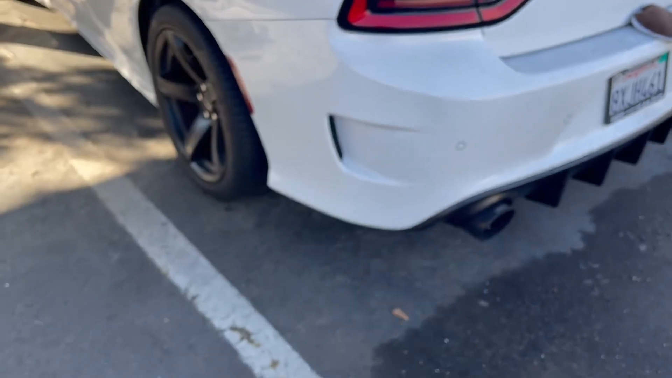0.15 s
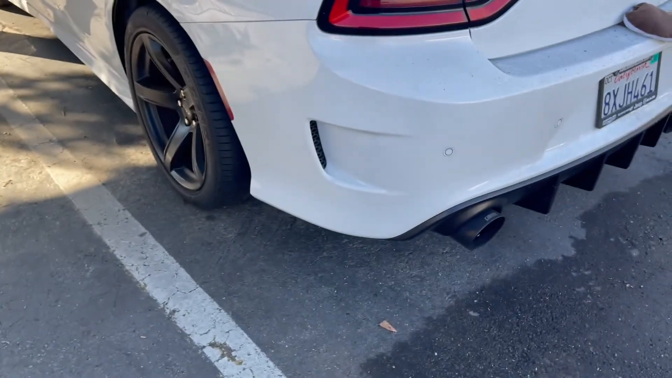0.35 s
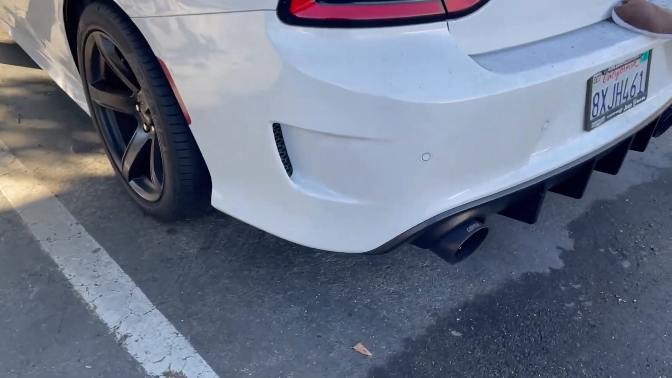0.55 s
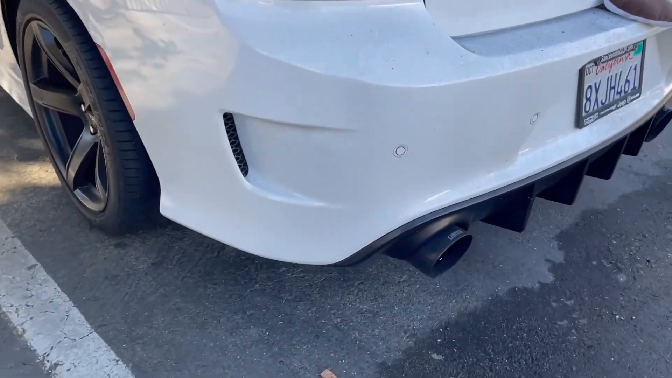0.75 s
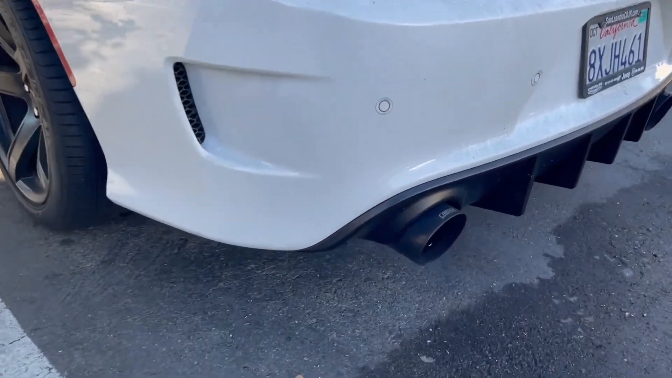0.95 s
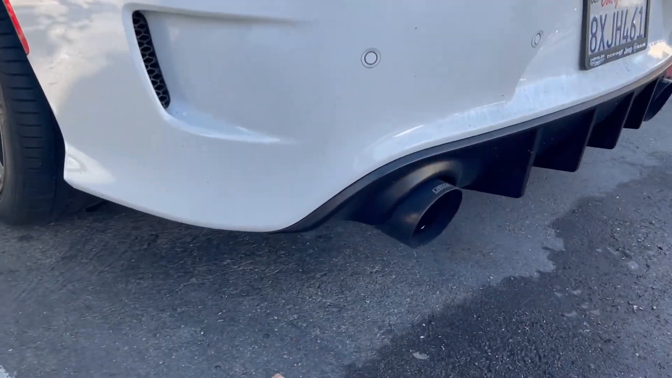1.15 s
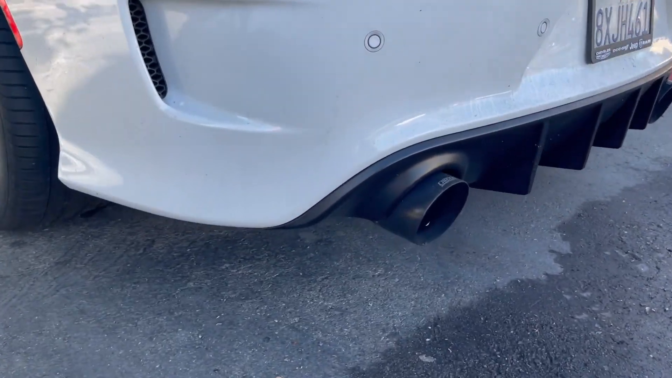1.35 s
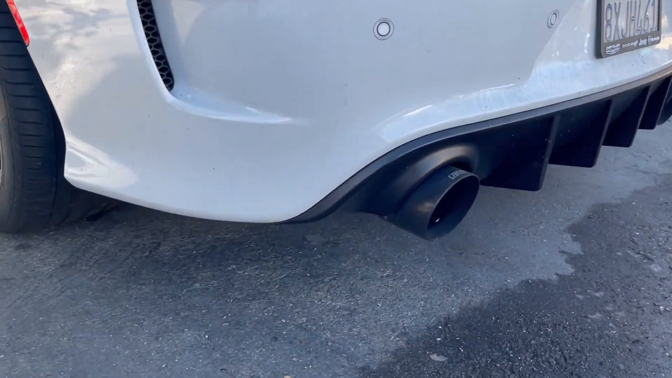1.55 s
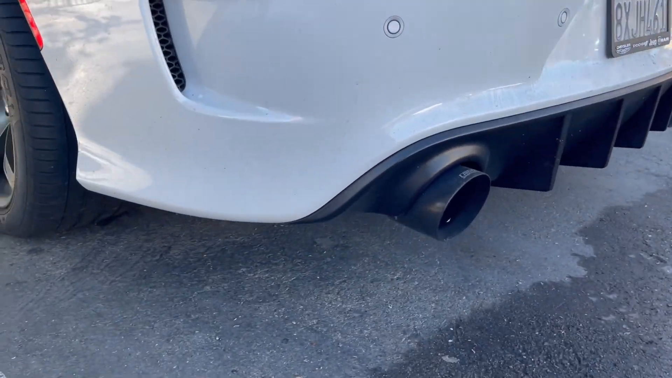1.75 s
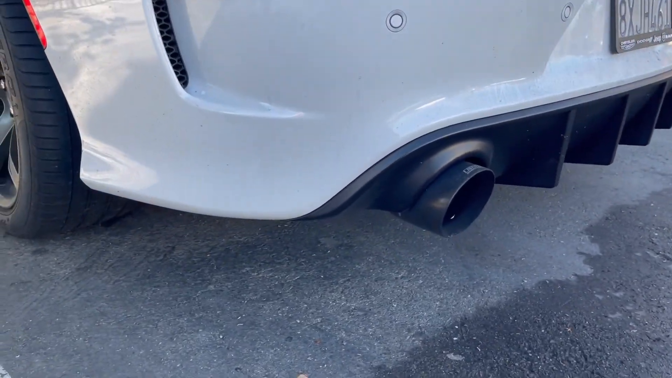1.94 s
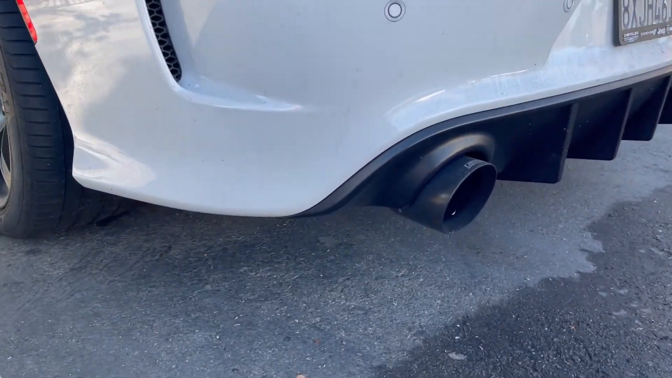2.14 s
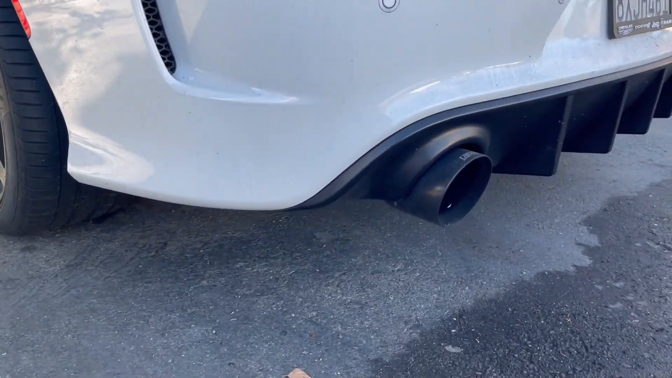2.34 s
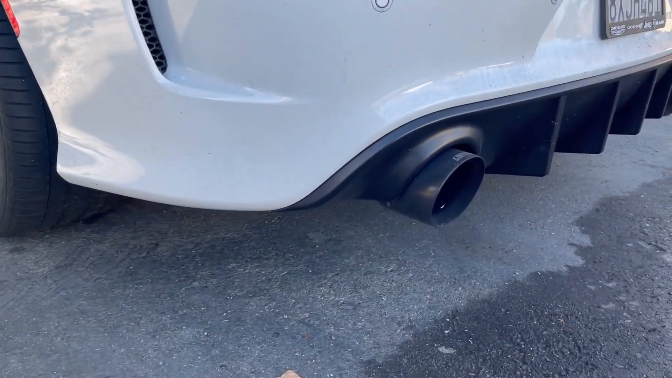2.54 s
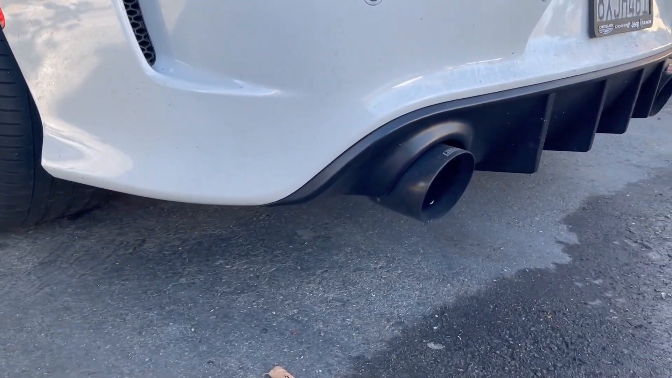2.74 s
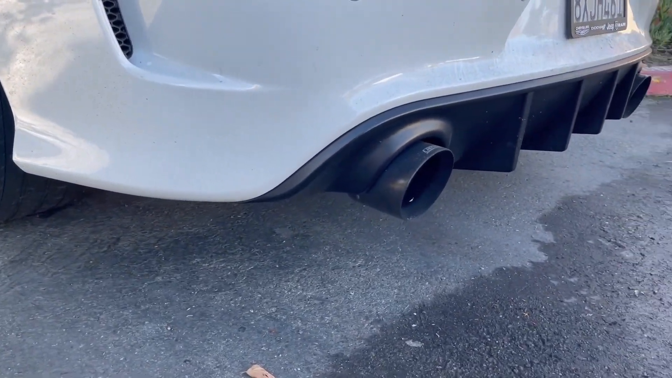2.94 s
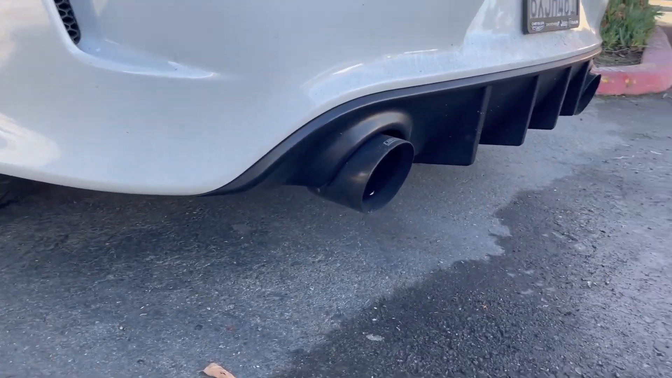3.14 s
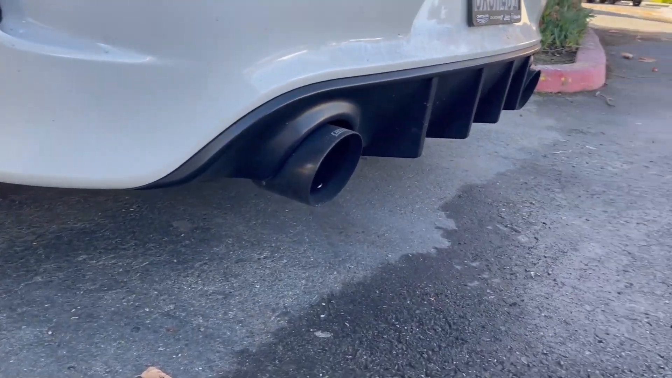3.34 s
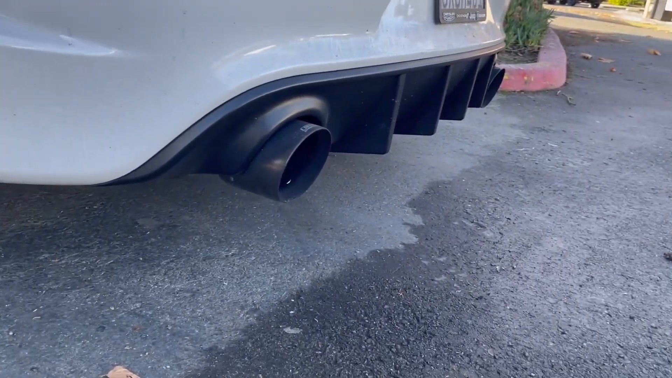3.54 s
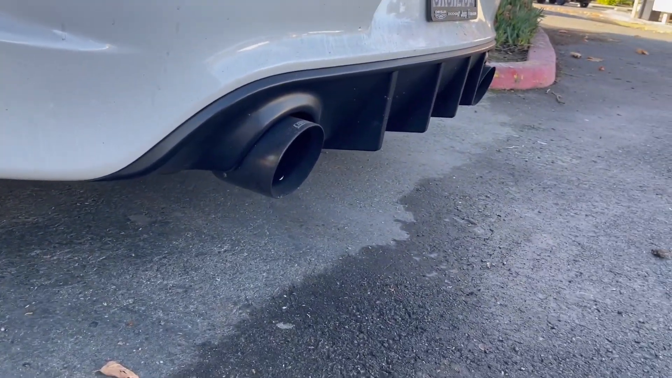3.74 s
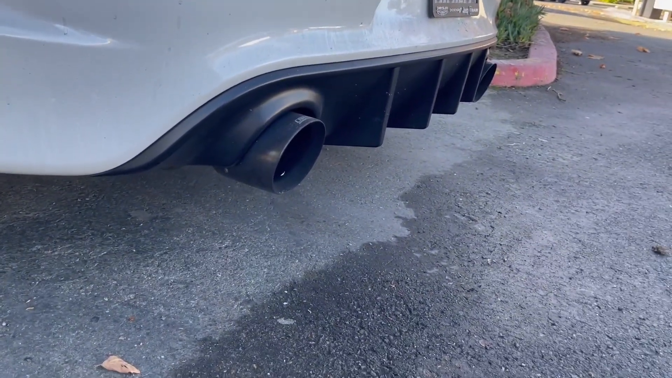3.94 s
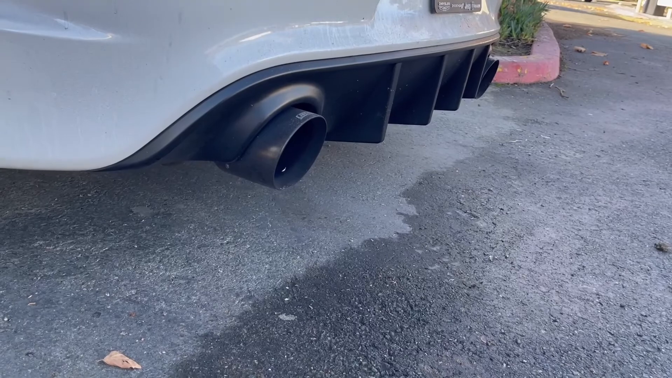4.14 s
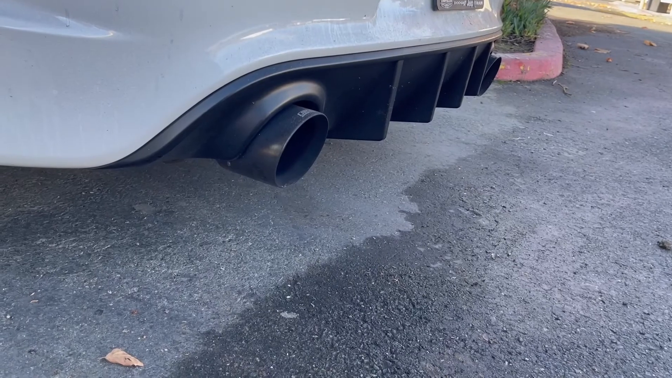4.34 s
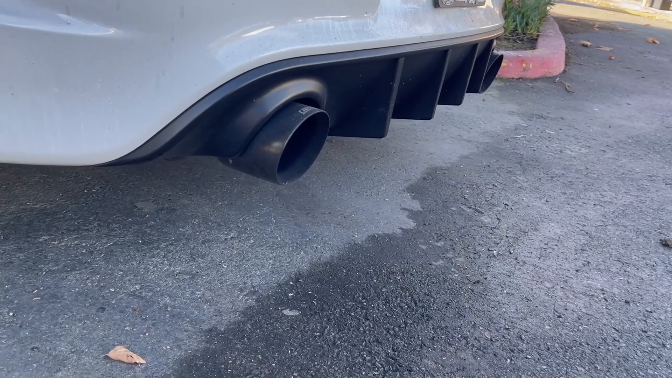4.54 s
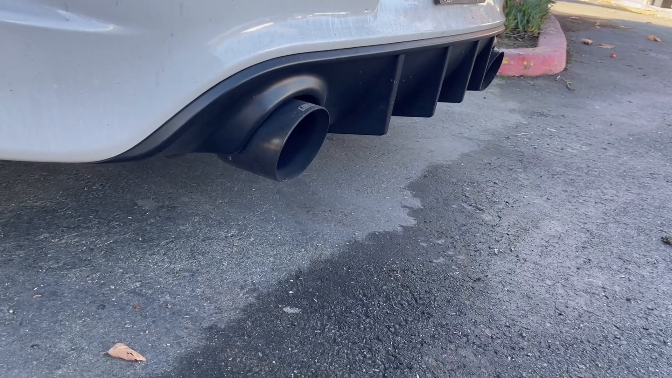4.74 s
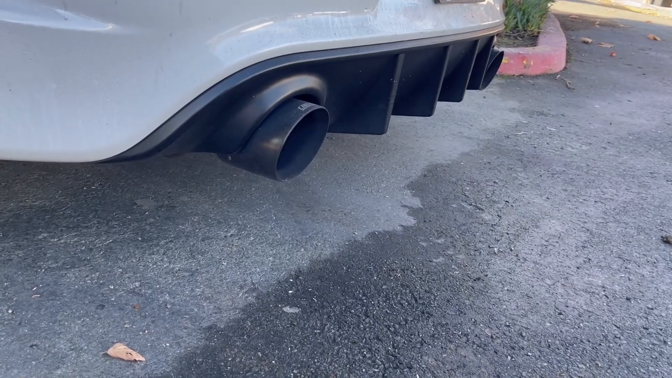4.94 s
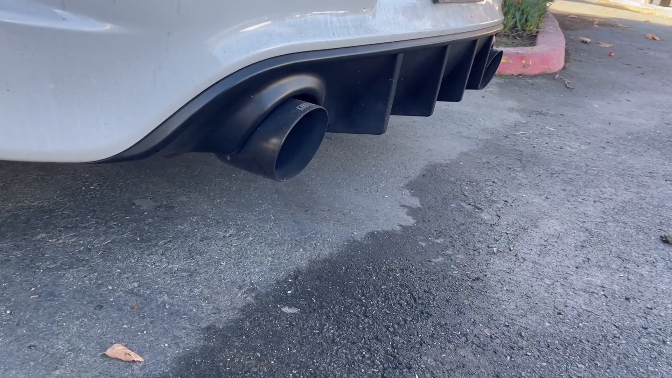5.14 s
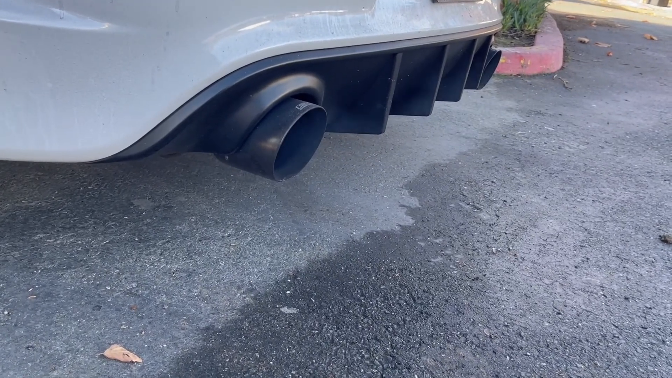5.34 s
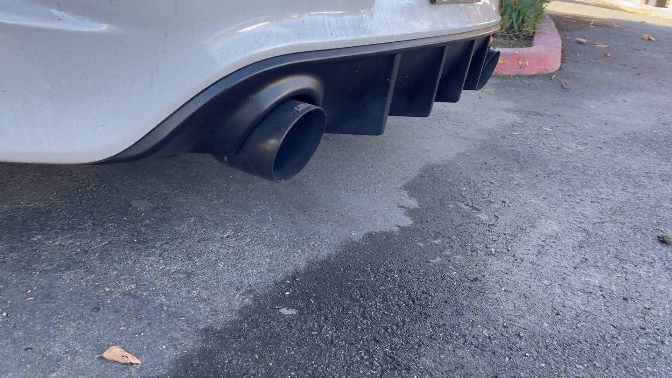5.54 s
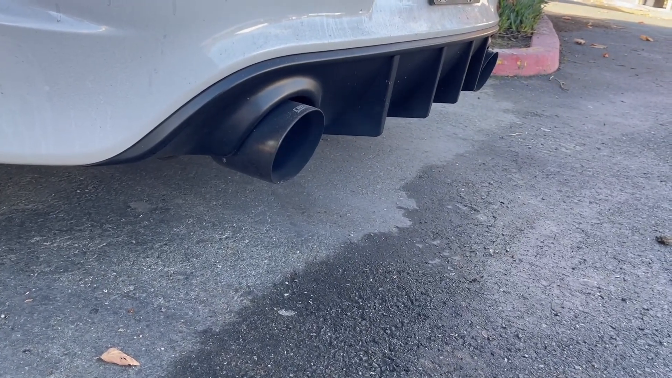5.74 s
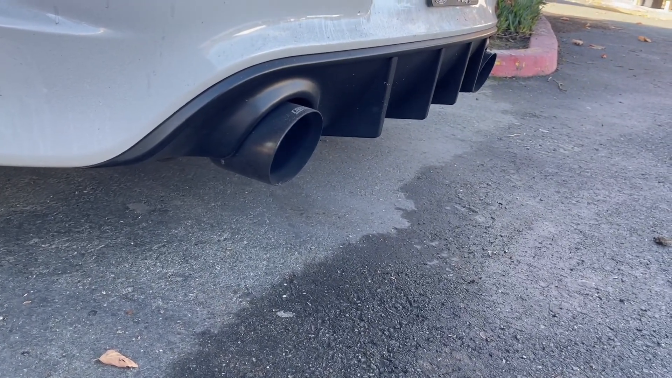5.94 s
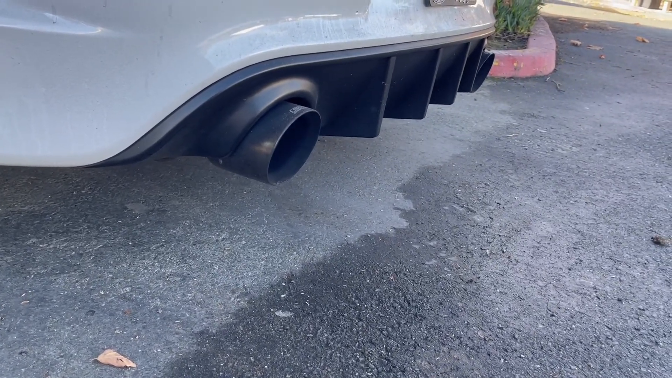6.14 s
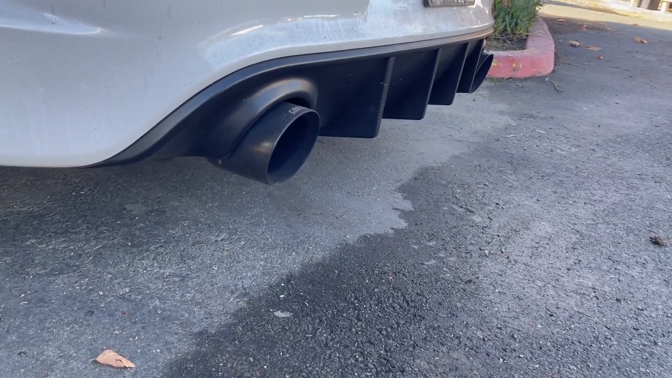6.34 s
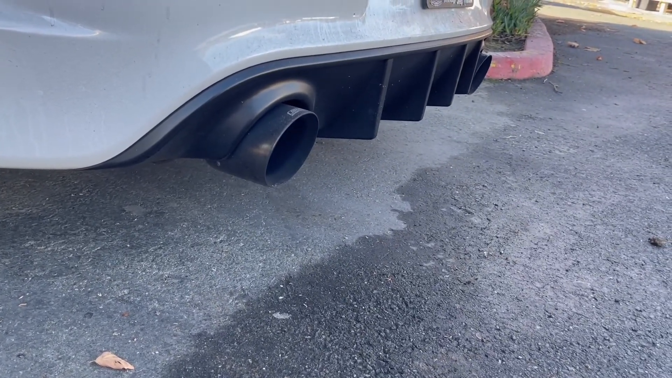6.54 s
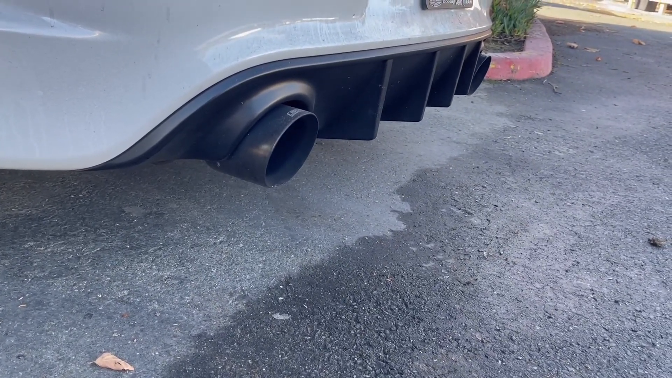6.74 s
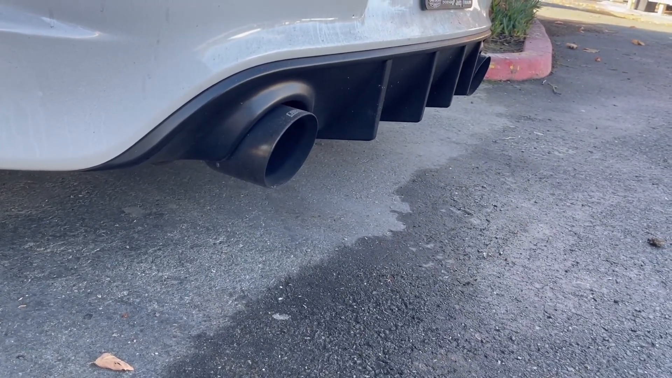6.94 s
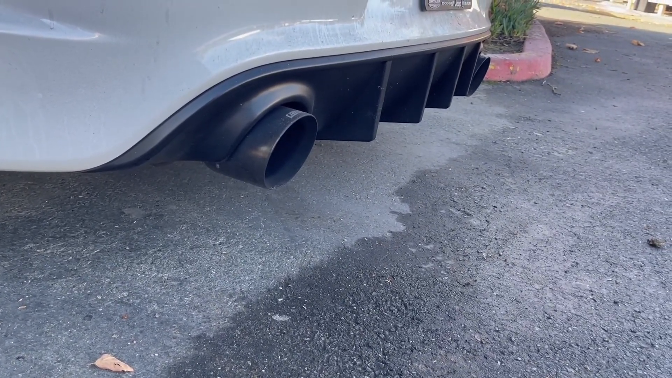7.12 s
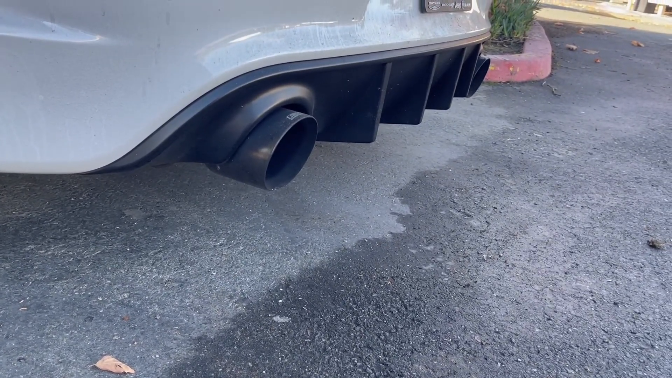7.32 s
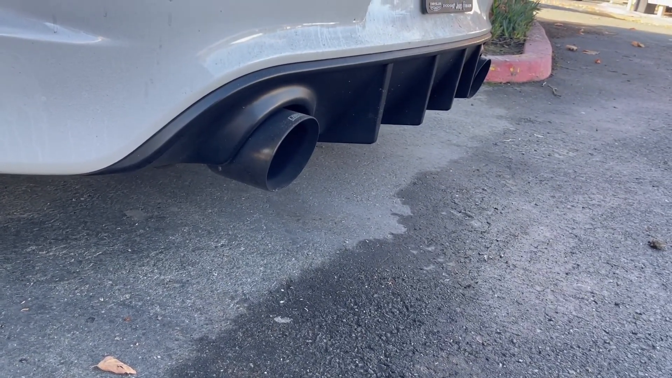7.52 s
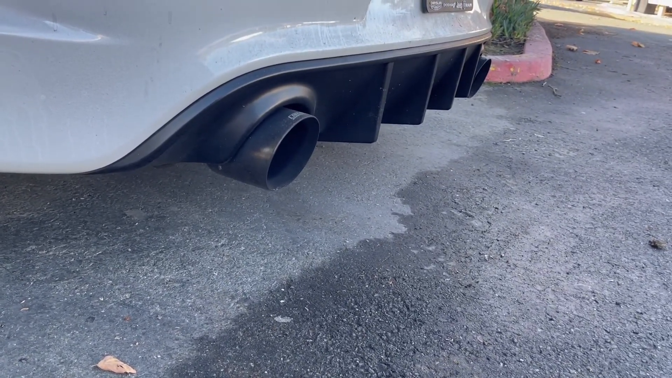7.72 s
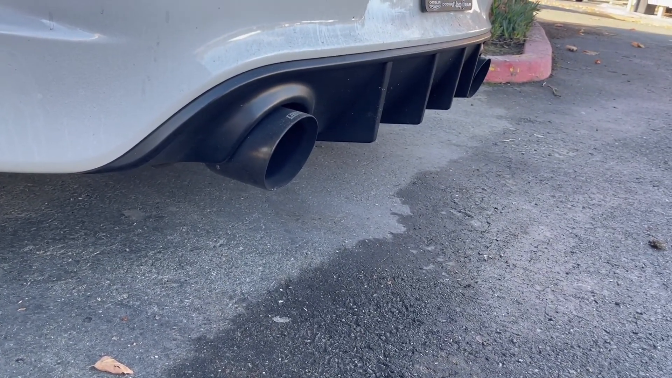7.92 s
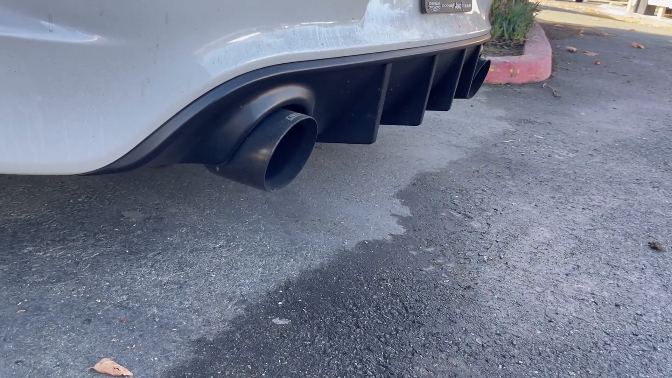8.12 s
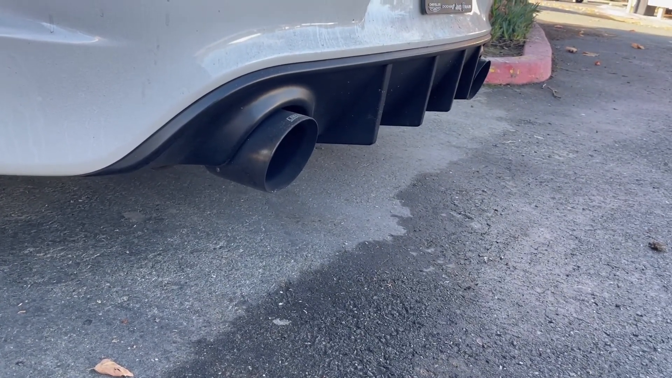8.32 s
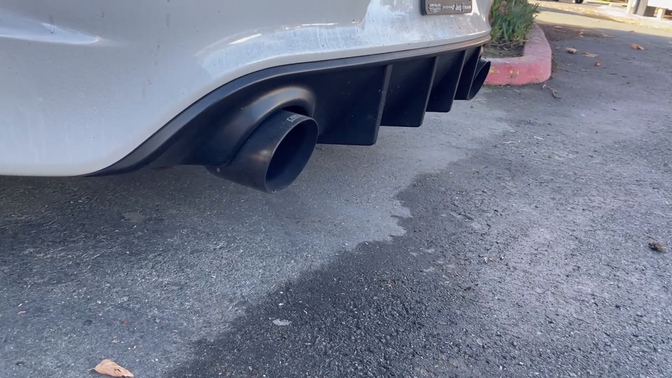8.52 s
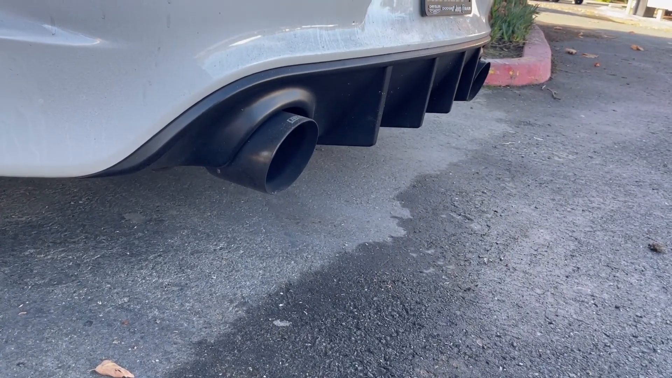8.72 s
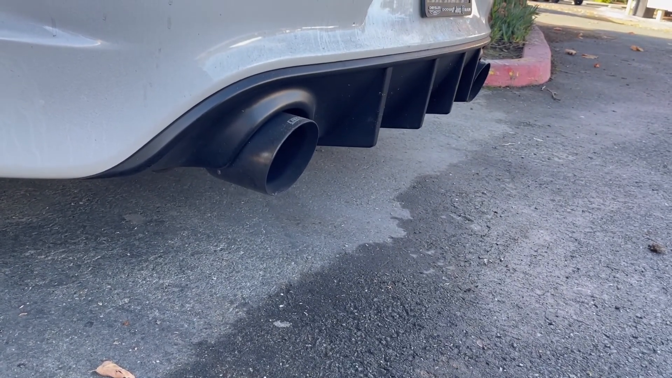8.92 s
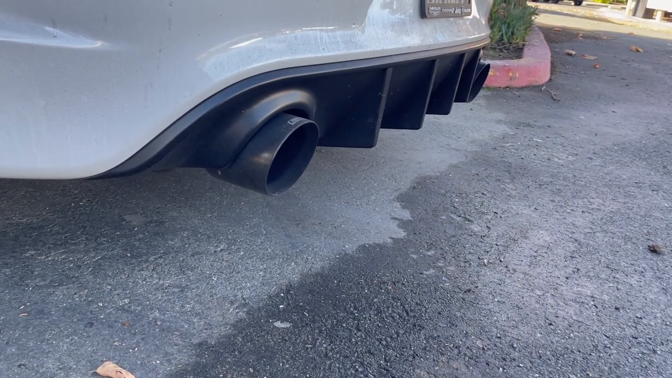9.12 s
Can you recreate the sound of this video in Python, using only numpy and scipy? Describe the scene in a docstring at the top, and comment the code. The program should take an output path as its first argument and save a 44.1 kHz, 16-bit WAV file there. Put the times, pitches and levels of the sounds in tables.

```python
"""A big V8 engine, heard close to one tailpipe in an open car park, is started from a key fob. Before it, over
traffic noise and a hum, buzzing horn tones chirp twice, a fuel pump hisses and whines, shoes scuff and a door
latch clunks as bursts of noise, and small clicks and knocks ring. The starter cranks with gear noise and
sagging whines. Each firing then sends a pulse into ringing pipes: a crackling flare that settles into a lumpy
fast idle."""
import sys
import numpy as np
from scipy import signal
from scipy.fft import rfft, irfft, next_fast_len
from scipy.io import wavfile
from scipy.ndimage import uniform_filter1d

SR = 44100
rng = np.random.default_rng(int(sys.argv[2]) if len(sys.argv) > 2 else 0)


def generate_wav(sig):
    """Save sig (samples, or channels by samples) to the path in sys.argv[1] as 16-bit PCM at SR."""
    pcm = np.round(np.clip(np.atleast_2d(sig).T, -1, 1) * 32767).astype(np.int16)
    wavfile.write(sys.argv[1], SR, pcm)


N = 404397
T = np.arange(N) / SR  # time of every sample [s]
NEAR, FAR = .9, .5  # left-right likeness of close and distant noise

# tailpipe colour of the sharp fronts and their turbulence: (frequency [Hz], level [dB])
RASP_COLOUR = [(400, 7.5), (490, -45), (580, -10), (750, -2.5), (1110, -5.5), (1420, -2.5), (1660, -38),
               (2400, -13), (3800, -42.5), (6000, -63.5)]


def amp(db):
    """Turns decibels into an amplitude factor."""
    return 10 ** (np.asarray(db) / 20)


def evened(x):
    """Scales a signal to an RMS level of one."""
    return x / np.sqrt(np.mean(x ** 2) + 1e-20)


def read(points, hz):
    """Reads a spectrum, straight between points on a log-frequency axis."""
    f, value = np.transpose(points)
    return np.interp(np.log(hz + 1), np.log(f + 1), value)


def play(rows, fade=0.0059):
    """The columns of a table at every sample, and a gate that is open while it lasts."""
    s, *columns = np.transpose(rows)
    gate = np.clip(np.minimum(T - s[0], s[-1] + fade - T) / fade, 0, 1)
    return gate, *(np.interp(T, s, c) for c in columns)


def noise(colour, same, patchy_db):
    """Two channels of coloured noise with drifting patches, alike by a share."""
    hz = np.fft.rfftfreq(512, 1 / SR)
    a, b, c, d, patches = rng.standard_normal((N // 128 + 5, 257, 5)).T
    patches = uniform_filter1d(patches, size=8, axis=0)
    patches = evened(uniform_filter1d(patches, size=14, axis=1))
    left = a + 1j * b
    right = same * left + np.sqrt(1 - same ** 2) * (c + 1j * d)
    z = np.array([left, right]) * amp(read(colour, hz)[:, None] + patchy_db * patches)
    return evened(signal.istft(z, nperseg=512, noverlap=384)[1][:, :N])


def causal(colour):
    """Impulse response with this colour and its energy as early as possible."""
    log_gain = np.log(amp(read(colour, abs(np.fft.fftfreq(4096, 1 / SR)))))
    return np.fft.ifft(np.exp(np.conj(signal.hilbert(log_gain)))).real[:2048]


def train(s, size):
    """Clicks at exact times, shared between neighbouring samples."""
    at = np.clip(s * SR, 0, N - 2)
    i = at.astype(int)
    return np.bincount(i, size * (1 - at + i), N) + np.bincount(i + 1, size * (at - i), N)


def strike(clicks, ring):
    """Lets every click set off the same short ring."""
    return signal.oaconvolve(clicks, ring)[:N]


def resonate(x, hz, width):
    """Shifts the curve hz down to zero, smooths, and shifts back: a resonance that can glide."""
    turn = np.exp(2j * np.pi * np.cumsum(hz * np.ones(N)) / SR)
    r = np.exp(-np.pi * width / SR)
    return 2 * (turn * signal.lfilter([1 - r], [1, -r], x / turn)).real


def surroundings(x, t60, level_db):
    """Scatter from ground, cars and walls, different at each side."""
    t = np.arange(SR // 2) / SR
    tail = rng.standard_normal((2, len(t))) * amp(-60 * t / t60) * (t > .004)
    tail /= np.linalg.norm(tail[0])
    return x + amp(level_db) * signal.fftconvolve(x[None], tail, axes=1)[:, :N]


def town():
    """Distant traffic as low coloured noise, with a wavering hum from a narrow resonance."""
    # colour of the traffic: (frequency [Hz], level [dB])
    traffic_colour = [(25, -3), (55, -0.5), (120, -20), (220, -23.5), (500, -29), (1220, -34.5),
                      (9000, -76)]
    hum = amp(-48.5) * evened(resonate(rng.standard_normal(N), 123.9, 4.9))
    return amp(-43) * noise(traffic_colour, FAR, 1.5) + hum


def horn():
    """Buzzing diaphragms that start a little flat, with a rattle and the scatter of the car park."""
    # horn chirps: (time [s], length [s], level [dB])
    chirps = [(0.25, 0.034, 5.5), (1.405, 0.064, -0.5)]
    # two horns: (fundamental [Hz], list of harmonic levels [dB])
    diaphragms = [(402, [-23.5, -22.5, -23.5, -27, -26.5, -27, -36.5, -42, -41]),
                  (479, [-23, -19.5, -26.5])]
    # the panel they shake: (frequency [Hz], level [dB])
    panel = [(218, -37), (267, -22.5), (518, -27.5)]
    rattle = noise([(200, -8.5), (2500, -18.5), (6000, -32.0), (12500, -35.5)], NEAR, 4)[0]
    lines = panel + [(f * (k + 1), d) for f, levels in diaphragms for k, d in enumerate(levels)]
    out = np.zeros(N)
    for s, length, db in chirps:
        t = np.clip(T - s, 0, 1)
        swell = (1 - np.exp(-(t / 0.022) ** 2)) * np.exp(-np.clip(t - length / 2, 0, 1) / 0.0084)
        bent_time = t - 0.00049 * (1 - np.exp(-t / 0.014))  # runs slow at first: the flat start
        buzz = sum(amp(d) * np.sin(2 * np.pi * (f * bent_time + rng.random())) for f, d in lines)
        out += amp(db) * swell * (buzz + amp(-26.5) * rattle)
    return surroundings(out, 0.41, 4.6)


def pump():
    """The fuel pump primes: hiss and thin tones that waver as noise through narrow resonances."""
    # loudness of the hiss: (time [s], level [dB])
    pump_levels = [(.26, -87), (.5, -53.5), (1.9, -51), (3.05, -56.5)]
    # colour of the hiss: (frequency [Hz], level [dB])
    pump_colour = [(1500, 10), (11000, 7.5), (12500, -6)]
    # thin tones: (frequency [Hz], level once fully grown [dB])
    pump_tones = [(468, -63.5), (4296, -68), (5044, -69)]
    gate, db = play(pump_levels, 0.058)
    air = rng.standard_normal(N)
    tones = sum(amp(d) * evened(resonate(air, f, 0.002 * f)) for f, d in pump_tones)
    tones = tones * np.clip(T - 1.3, .3, 1)  # they grow from 1.6 to 2.3 s
    return gate * (amp(db) * noise(pump_colour, FAR, 1.5) + tones)


def scuffs():
    """Shoes and clothes rub and a door latch clunks: gritty noise bursts that rise fast and die away."""
    # rubs of shoes and clothes, and a door latch clunk at 1.57 s: (time [s], level [dB])
    rubs = [(0.5305, -40.5), (0.774, -34), (0.903, -41.5), (1.002, -43), (1.244, -38.5), (1.308, -45.5),
            (1.57, -29.5), (1.85, -30), (2.05, -34.5)]
    rise_s, t60_s, tilt_db_per_octave = .012, .4, -4.5
    roughness = uniform_filter1d(rng.standard_normal(N), size=60) * np.sqrt(60)
    grit = noise([(150, -4.5), (12000, 3.5), (13000, -74)], FAR, 2.5) * amp(0.93 * roughness)
    out, t = np.zeros((2, N)), np.arange(SR // 2) / SR
    hz = np.fft.rfftfreq(len(t), 1 / SR) + 100
    tilt = amp(tilt_db_per_octave * np.log2(hz / 4000))
    for s, db in rubs:
        i = round((s - rise_s / 2) * SR)
        part = irfft(rfft(grit[:, i:i + len(t)]) * tilt, len(t))
        out[:, i:i + len(t)] += part * amp(db - 60 * t / t60_s) * (1 - np.exp(-(t / rise_s) ** 2))
    return out


def ticks():
    """Small plastic and metal clicks with a short hollow body."""
    # fob button and relays: (time [s], level [dB])
    clicks = [(1.004, -22), (3.252, -31), (3.299, -39), (3.317, -38)]
    t = np.arange(400) / SR
    snap = np.exp(-t / 0.0001) * np.cos(2 * np.pi * 6500 * t)
    body = 0.5 * np.exp(-t / 0.0007) * np.sin(2 * np.pi * 1100 * t)
    s, db = np.transpose(clicks)
    return strike(train(s, amp(db)), snap + body)


def knocks():
    """Dull knocks: a soft low ring that dies at once."""
    # knocks of heels, and then of air in the pipe: (time [s], level [dB])
    thuds = [(1.592, -42), (3.977, -26.5), (4.081, -19.5), (4.175, -20)]
    t = np.arange(3000) / SR
    s, db = np.transpose(thuds)
    ring = t / 0.0097 * np.exp(1 - t / 0.0064) * np.sin(2 * np.pi * 310 * t)
    return strike(train(s, amp(db)), ring)


def starter():
    """Gear noise, a whine that bursts and sags at each surge, and air chugging in the pipes."""
    # running time of the starter: (start [s], end [s])
    crank_s = (3.515, 4.21)
    # surges past each compression: (time [s], starting whine pitch [Hz], whine level [dB])
    surges = [(3.631, 1970, -50), (3.719, 1680, -36), (3.808, 1810, -40), (3.899, 1980, -30.5),
              (4.024, 2067, -29), (4.141, 2056, -32)]
    # colour of the gear noise: (frequency [Hz], level [dB])
    gear_colour = [(200, -20), (330, -2), (2050, -1.5), (2900, -4.5), (10500, -19)]
    t = np.clip(T - crank_s[0], 0, 1)
    gate = np.clip(np.minimum(t, crank_s[1] - T) / 0.0043, 0, 1)
    air = rng.standard_normal((2, N))
    s, top_hz, db = np.transpose(surges)
    last = np.clip(np.searchsorted(s, T) - 1, 0, None)  # the latest surge at every sample
    since = np.clip(T - s[last], 0, 1)
    swell = (1 - np.exp(-since / 0.0048)) * np.exp(-since / 0.033)
    swell *= 1 + .7 * evened(resonate(air[1], 100, 30))  # the teeth judder
    waver = 1 + .012 * evened(resonate(air[1], 12, 15))
    hz = top_hz[last] * waver - 900 * since  # sags by 900 Hz per second
    turns = np.cumsum(hz) / SR
    whine = sum(amp(d) * np.cos(2 * np.pi * n * turns) for n, d in [(.5, 1.5), (1, 3.0), (1.5, -3.5)])
    chug = evened(resonate(resonate(air[1], 31, 77), 39, 120)) * np.minimum(t / 0.045, 1)
    gear_db = -33.5 + 9 * np.exp(-(t / 0.091) ** 2)  # the pinion grinds in, then runs
    gears = amp(gear_db) * noise(gear_colour, NEAR, 2.5)
    return gate * (gears + amp(db[last]) * swell * whine + amp(-30.5) * chug)


def low_throb(at, size, lumps, bank, hz, uneven):
    """Blows ring the exhaust pipes; banks that differ add and cancel to a lumpy throb."""
    # exhaust pipe modes: (frequency [Hz], width [Hz], signed gain for bank 0, for bank 1)
    pipe_modes = [(105, 35, -2.12, -1.81), (265, 35, -0.34, 0.92), (326, 35, -7.46, 8.24),
                  (329, 37, 6.12, -7.82), (291, 43, 2.12, -1.63)]
    # band damped until the gas warms: (time of most damping [s], end [s])
    cold_s = (4.92, 7.3)
    t = np.arange(6000) / SR
    one, two = sum(np.outer([a, b], np.exp(-np.pi * w * t) * np.sin(2 * np.pi * f * t))
                   for f, w, a, b in pipe_modes)
    # at speed the crossover evens the banks out: what sets them apart grows with unevenness
    throb = strike(train(at, size), one + two)
    throb = throb + strike(train(at, size * lumps * (1 - 2 * bank)), one - two)
    # the firing rate is left to a tone of its own, its octave is muffled
    octave = resonate(throb, 2 * hz, 4.8)
    throb = throb - resonate(throb, hz, 4.8) - .35 * uneven * octave
    # open pipes radiate no deep bass, the muffler takes the top
    band = signal.butter(3, [76, 455], "band", fs=SR, output="sos")
    throb = evened(signal.sosfiltfilt(band, throb))
    cold = np.interp(T, [cold_s[0] - 1, *cold_s], [0, .75, 0])
    return throb - cold * resonate(throb, 291, 38)


def side_branches(odd):
    """Side volumes of the exhaust ring with the difference between the banks."""
    # side volumes: (frequency [Hz], width of each of two passes [Hz], level over the rasp [dB])
    volumes = [(190, 26, -8.5), (361.9, 26, -2)]
    return sum(amp(d) * evened(resonate(resonate(odd, f, w), f, w)) for f, w, d in volumes)


def flare_drone(hz, turns, climbing):
    """An even drone of the flare, locked to the firing, that dies as the revs sink."""
    # drone: (multiple of firing rate, time of full strength [s], level [dB], fade [dB/s])
    drone_tones = [(3, 4.4, -10, 29)]
    fast = np.clip(np.where(climbing > 0, 1, (hz - 122.3) / 2.1), 0, 1)  # gone at 122.3 Hz
    out = 0
    for n, s, db, fade_db in drone_tones:
        rise = np.clip(1 + (T - s) / 0.075, 0, 1)
        level = amp(db - fade_db * np.clip(T - s, 0, 1))
        out = out + rise * level * np.sqrt(2) * np.cos(2 * np.pi * round(n) * turns)
    return fast * out


def muffler_rings(front_s, front_db, note_hz):
    """Each front rings the muffler chambers and a note of its own; returns both sounds."""
    # muffler chambers: (frequency [Hz], width [Hz], level [dB])
    chambers = [(756, 16, 5), (1426, 320, -4), (1760, 15.6, 3), (2920, 160, -17.5)]
    t = np.arange(6000) / SR
    soft = np.minimum(t / .001, 1)  # the chambers fill in a moment
    # no two blows ring the chambers alike
    share_db = 1.8 * rng.standard_normal((len(front_s), len(chambers))).T
    ring = 0
    for (f, w, db), share in zip(chambers, share_db):
        body = soft * w * np.exp(-np.pi * w * t) * np.sin(2 * np.pi * f * t)
        ring = ring + strike(train(front_s, amp(db + front_db + share)), body)
    dying = soft * np.exp(-np.pi * 80 * t)  # 80 Hz wide
    note_size = amp(front_db + share_db[0] / 2)
    notes = sum(strike(train(front_s, note_size * (note_hz == f)), dying * np.sin(2 * np.pi * f * t))
                for f in np.unique(note_hz))
    return ring, notes


def tailpipe_rasp(fronts, rings, rough, hz, turns):
    """Sharp pressure fronts leave the tailpipe, coloured, ringing and roughened by cracks."""
    ring, notes = rings
    rounded = signal.lfilter(*signal.butter(2, 2400, fs=SR), fronts)
    plain = evened(strike(rounded, causal(RASP_COLOUR)))
    # ragged burning sharpens the fronts
    bright = 1.2 * (rough - rough.min()) * evened(np.gradient(np.gradient(plain)))
    rasp = bright + amp(-15.0 + 6 * rough) * plain
    rasp = rasp + amp(-12) * evened(ring) + amp(-5.5 - 32.5 * rough) * evened(notes)
    # even overtones of the firing
    overtones = sum(amp(read(RASP_COLOUR, n * hz)) * np.cos(2 * np.pi * n * turns + n * n)
                    for n in range(6, 14))
    rasp = rasp + amp(-14) * overtones
    return rasp * (1 + 6 * after_cracks(0.27, 0.0088))  # each crack makes the next blows bark


def engine():
    """Each firing blows into the pipes of its bank, with a sharp front and a puff of hiss."""
    # firings of all eight cylinders: (time [s], rate [Hz])
    firing = [(4.2, 46.0), (4.3, 63.0), (4.4, 105.0), (4.45, 122.33), (4.57, 129.65), (4.65, 131.64),
              (4.85, 128.4), (5.0, 119.75), (5.1, 117.21), (5.5, 115.59), (6.1, 112.59), (6.4, 110.93),
              (7.0, 109.9), (7.3, 108.66), (7.9, 106.93), (8.5, 106.82), (9.1, 107.65)]
    # low blow of each cylinder in firing order, its differences evened out at speed:
    # (bank 0 or 1, delay [ms], strength [dB])
    cylinders = [(1, 1.42, 3.2), (0, 1.63, -0.2), (0, 1.24, 3.0), (1, 1.08, -0.7), (0, 1.25, -1.3),
                 (1, 1.96, 2.0), (1, 1.13, 4.3), (0, 1.79, -0.7)]
    # sharp front of each blow, same order: (strength before evening [dB], note it rings [Hz])
    front_rows = [(3, 1050), (1.5, 900), (8.5, 1060), (6.5, 950), (4.5, 850), (3.5, 800), (4.5, 1150),
                  (2, 1100)]
    # exhaust loudness controls: (time [s], rasp level [dB], low throb level [dB])
    exhaust = [(4.3, -18, -15.5), (4.4, -21.5, -21), (4.5, -22, -13), (4.7, -26.5, -14),
               (4.9, -33.5, -17.5), (5.15, -37, -28), (5.5, -34.5, -26.5), (6, -34, -21), (9.1, -29.5, -21)]
    # colour of the hiss: (frequency [Hz], level [dB])
    hiss_colour = [(1200, 5), (10500, 4), (12500, -12.5)]

    _, rasp_db, throb_db = play(exhaust)
    hiss_db = -9 + 1.56 * rasp_db  # hiss swings wider than the rasp
    # the firing tone is strong while the revs climb, then low and slowly growing
    run_up_end_s = 4.45
    climbing = np.clip((run_up_end_s - T) / 0.17, 0, 1)
    tone_db = climbing * -13.5 + (1 - climbing) * (-23.5 + 0.55 * (T - run_up_end_s))
    gate = np.clip((T - 4.204) / .004, 0, 1)  # the first cylinder fires

    hz = play(firing)[1]
    first_turn = .83  # place in the firing order where the engine catches
    turns = first_turn + np.cumsum(hz * (T >= firing[0][0])) / SR  # firings counted so far
    uneven = np.clip((130 - hz) / 16, .25, .8)  # the faster, the more even
    rough = np.clip(.07 + (hiss_db + 50) / 60, .07, 1)  # a cold rich flare burns raggedly

    k = np.arange(1, int(turns[-1]))
    s = np.interp(k, turns, T)  # time of each firing
    bank, delay_ms, db = np.array(cylinders)[k % 8].T
    front_db, note_hz = np.array(front_rows)[k % 8].T
    lumps = np.interp(s, T, uneven)
    chance = np.interp(s, T, rough) * rng.standard_normal((len(k), 4)).T
    mean_ms = np.mean(cylinders, 0)[1]
    at = s + (mean_ms + lumps * (delay_ms - mean_ms) + .5 * chance[0]) / 1000
    size = amp(lumps * db + 4.9 * chance[1])

    throb = low_throb(at, size, lumps, bank, hz, uneven)
    branches = side_branches(train(at, size * (1 - 2 * bank)))
    tone = np.sqrt(2) * np.cos(2 * np.pi * (turns + .52))

    front_s = s + (1.9 + .6 * chance[2]) / 1000  # about 1.9 ms after the firing
    fronts = train(front_s, amp(lumps * front_db + 4 * chance[3]))
    puffs = evened(signal.lfilter([1], [1, -np.exp(-1 / (0.02 * SR))], fronts))
    turbulence = amp(-5) * noise(RASP_COLOUR, NEAR, 2) * (1 + puffs)
    hiss = noise(hiss_colour, NEAR, 1.5) * (1 + puffs) / 2

    rings = muffler_rings(front_s, front_db, note_hz)
    rasp = tailpipe_rasp(fronts, rings, rough, hz, turns)
    rasp = surroundings(gate * amp(rasp_db) * rasp, .1, -8)
    low = amp(throb_db) * throb + amp(tone_db) * tone
    airy = amp(rasp_db) * (turbulence + uneven * branches) + amp(hiss_db) * hiss
    return gate * (low + airy) + rasp + flare_drone(hz, turns, climbing)


def after_cracks(share, decay_s):
    """A jump at each crack that dies away; share of the crack's dB."""
    # unburnt fuel cracks in the pipe: (time [s], relative level [dB])
    crack_rows = [(4.2152, -1), (4.237, -10), (4.259, -13), (4.293, -8.5), (4.3298, -7), (4.364, -17),
                  (4.395, -6), (4.463, -15), (4.4746, -9), (4.504, -8), (4.5186, -7.5), (4.536, -11.5),
                  (4.558, -7), (4.586, -3), (4.6196, -13.5), (4.649, -10.5), (4.68, -24), (4.7104, -20.5),
                  (4.741, -33), (4.774, -38), (4.805, -36), (4.913, -32)]
    s, db = np.transpose(crack_rows)
    return strike(train(s, amp(share * db)), np.exp(-np.arange(2500) / (decay_s * SR)))


def cracks():
    """Unburnt fuel cracks in the pipe: short bright snaps of noise."""
    colour = [(1200, 8), (4500, -10.0), (9000, -11.0), (12500, -25)]
    return 0.5 * after_cracks(1, 0.009) * noise(colour, NEAR, 0.4)


def ports(x, lower_hz=0):
    """A pair of microphone ports with a phase and level offset, weak in the deepest bass."""
    # phase offset: (frequency [Hz], lead of the left [radians])
    lead = [(0, 0), (1460, .4), (1980, 5.9), (3010, 7.2), (7750, 6.8), (11400, .1)]
    # level offset: (frequency [Hz], left minus right [dB])
    tilt = [(60, -1), (1100, 4), (11800, 0)]
    size = next_fast_len(N + 4096)
    hz = np.fft.rfftfreq(size, 1 / SR)
    phase = np.exp(.5j * np.interp(hz + lower_hz, *np.transpose(lead)))
    half = amp(read(tilt, hz) / 2) * phase  # half the offset to each side
    bass_cut = 1 + (35 / (hz + 1)) ** 4
    return irfft(rfft(x, size) * [half, 1 / half] / bass_cut, size)[:, :N]


def scene():
    """Adds up all sources; the starter sits further round, so its left lead sets in lower."""
    around = town() + horn() + pump() + scuffs() + ticks() + knocks()
    return ports(around + engine() + cracks()) + ports(starter(), 350)


def record(dry):
    """Soft overload rounds the loudest peaks, then a filter removes the top above 12450 Hz."""
    loud = dry / (1 + abs(dry / .97) ** 4) ** .25
    low_pass = signal.firwin(511, 12450, window=("kaiser", 9), fs=SR)
    return signal.oaconvolve(loud, low_pass[None], "same")


dry = scene()
out = record(dry)
generate_wav(out)
```